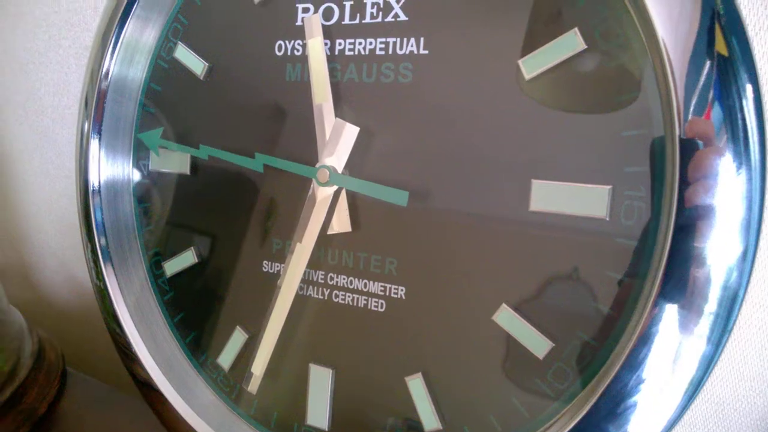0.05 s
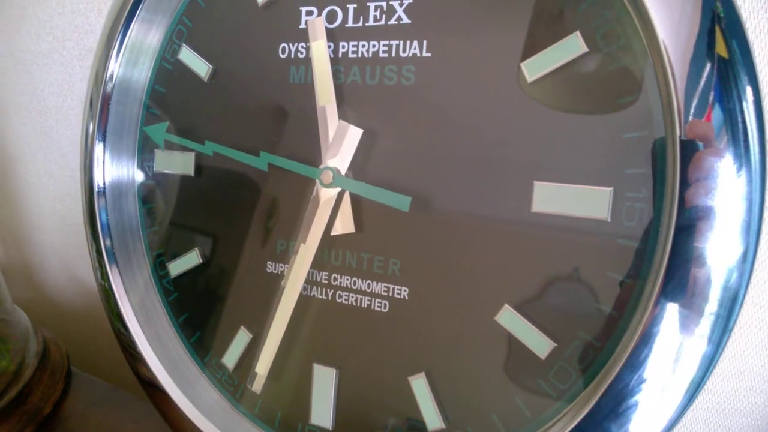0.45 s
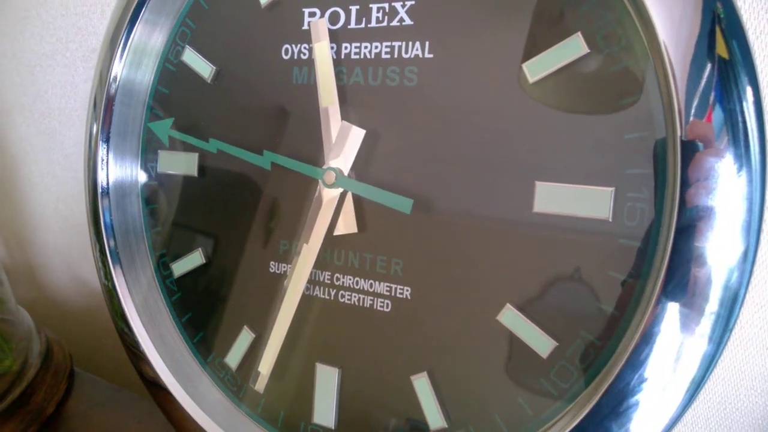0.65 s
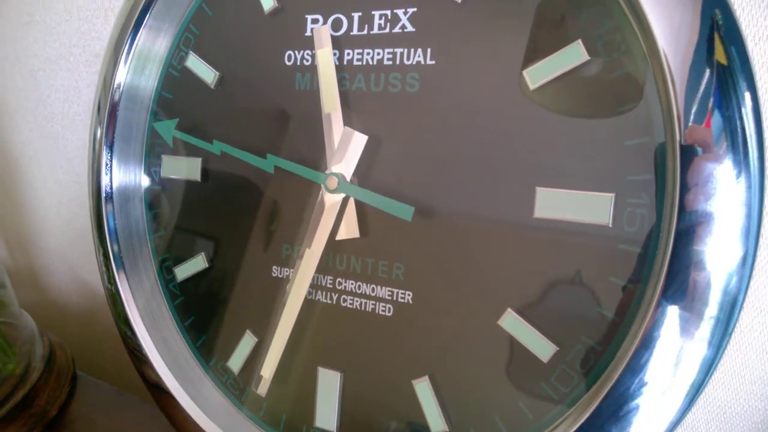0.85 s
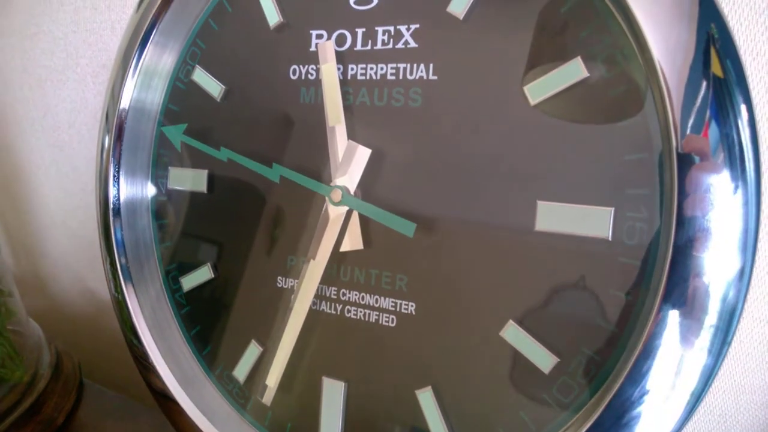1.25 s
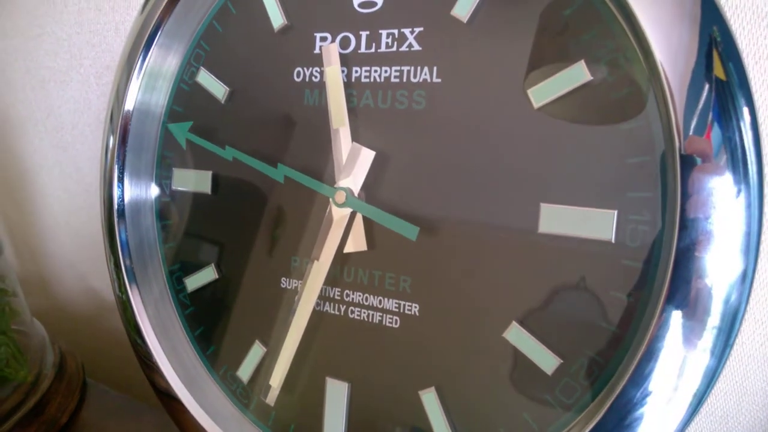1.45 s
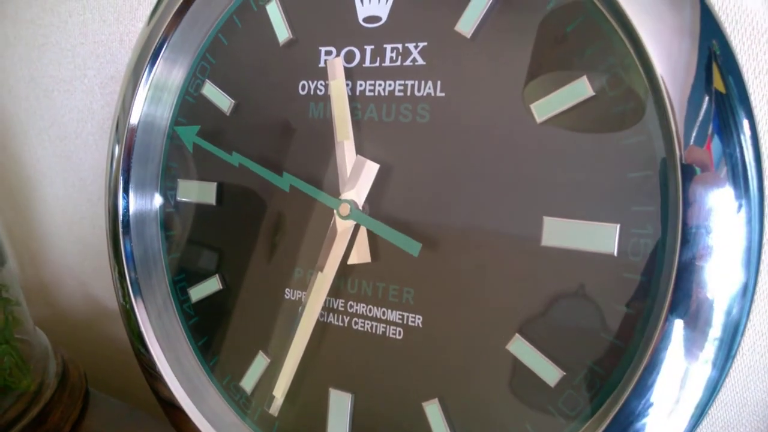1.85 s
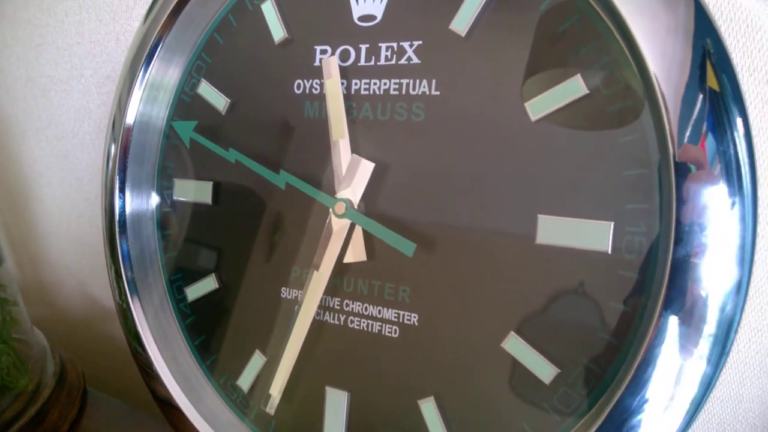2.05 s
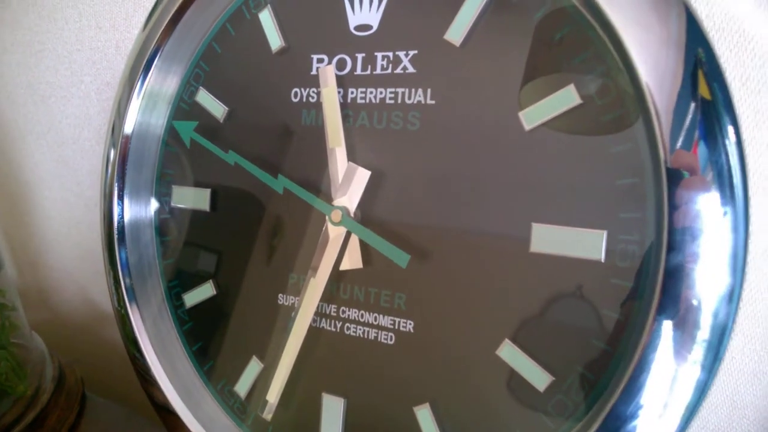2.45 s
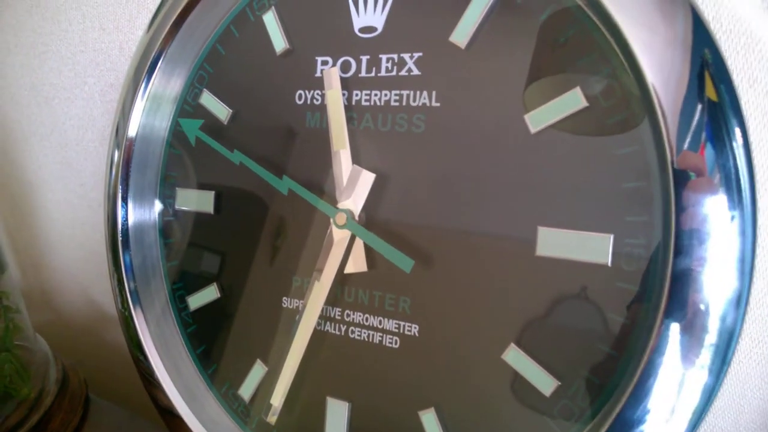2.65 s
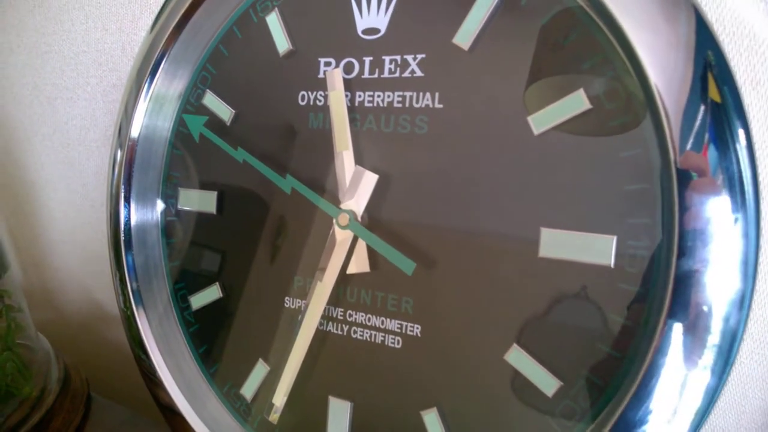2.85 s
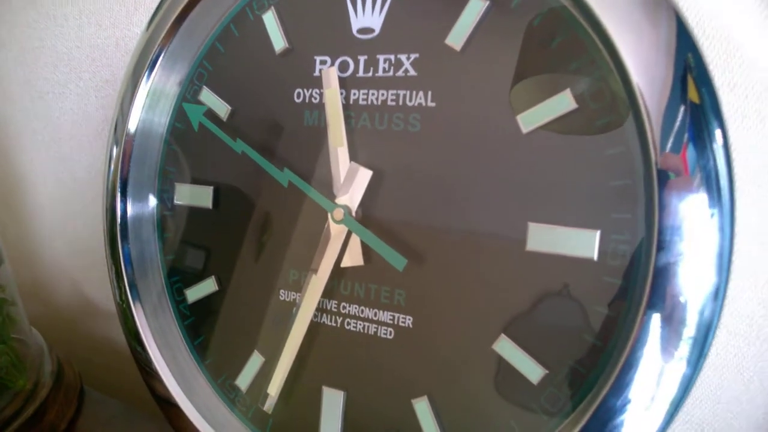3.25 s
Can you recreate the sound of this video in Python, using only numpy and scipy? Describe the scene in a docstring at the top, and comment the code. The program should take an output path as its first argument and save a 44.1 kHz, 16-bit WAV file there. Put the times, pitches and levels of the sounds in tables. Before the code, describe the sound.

Low rumble of a hand-held microphone, with one small click and two soft scuffs.

```python
"""A quiet room, heard from a hand-held camera close to a wall clock.
One small, sharp click rings briefly, and two soft, hollow scuffs sound farther off, two seconds apart.
The hand rumbles as it rocks and rubs the camera, the grip gives a few dull bumps, and fingers rustle.
Behind it all are an even hiss, a low drone and a faint hum."""
import sys
import numpy as np
from scipy import signal
from scipy.fft import rfft, irfft, next_fast_len
from scipy.io import wavfile
from scipy.ndimage import map_coordinates

SR = 44100
rng = np.random.default_rng(int(sys.argv[2]) if len(sys.argv) > 2 else 0)


def unload_audio(sound):
    """Save the sound as a 16-bit wav file, at the path given as the first command line argument."""
    columns = np.transpose(np.atleast_2d(sound))
    # keep every value between -1 and 1, then stretch to whole-number steps
    steps = np.round(np.clip(columns, -1, 1) * 32767)
    wavfile.write(sys.argv[1], SR, steps.astype(np.int16))


N = 149940
TIME = np.arange(N) / SR


def amp(db):
    """Turn decibels into a number to multiply by."""
    return 10 ** (np.asarray(db) / 20)


def wobble(rate):
    """A smooth random curve through `rate` values a second."""
    return map_coordinates(rng.standard_normal(200), [TIME * rate], mode="wrap")


def noise(gain_at):
    """Noise of average strength (rms) 1, shaped by a gain for each frequency."""
    size = next_fast_len(N + 8192)
    spectrum = rfft(rng.standard_normal(size)) * gain_at(np.fft.rfftfreq(size, 1 / SR))
    shaped = irfft(spectrum, size)[:N]
    return shaped / np.sqrt(np.mean(shaped ** 2) + 1e-30)


def coloured(points):
    """Noise whose tone colour follows (f/Hz, relative level/dB) points."""
    f, db = np.transpose(points)
    return noise(lambda hz: amp(np.interp(np.log(hz + 1), np.log(f + 1), db)))


def decay(start, fade):
    """Jump to 1 at `start`, then die away; a fade time is how long a 60 dB drop takes."""
    age = TIME - start
    return (age >= 0) * np.exp(-np.log(1000) * np.abs(age) / fade)


def swell(peak, rise, fade):
    """Grow to 1 at the time `peak`, then die away."""
    age = TIME - peak
    return np.exp(np.minimum(age / rise, -np.log(1000) * age / fade))


def ping(hz, start, fade):
    """A pure tone that starts suddenly and dies away."""
    return np.sin(2 * np.pi * hz * (TIME - start)) * decay(start, fade)


# The hits that make up the click: t/s, level/dB, fade time/s
CLICK_HITS = [(0.3966, -52, 0.0045), (0.3998, -47, 0.019), (0.4164, -48.5, 0.014)]
# Tone colour of the crack and its echo: f/Hz, relative level/dB
CRACK_COLOUR = [(600, -50), (1500, -19), (2200, -11), (3300, -1.5), (4600, -4), (6300, -5), (8500, -8.5),
                (10000, -5.5), (11500, -14), (15500, -28)]
# Tones the small part rings with: f/Hz, relative level/dB, fade time/s
CLICK_TONES = [(3104, -17, .2), (3374, -32, 0.24), (3495, -21.5, 0.2), (3536, -21, 0.17), (3840, -20, 0.13),
               (6040, -22, 0.087), (6500, -26, 0.099), (7200, -17, 0.12), (9500, -25, .1)]
def click(low_cut_hz=1710, echo_db=-11.5, echo_fade_s=0.2):
    """Three quick, hard hits blend into one click: each has a crack, a thin ring and a room echo."""
    out = np.zeros(N)
    for start, db, crack_fade in CLICK_HITS:
        crack = coloured(CRACK_COLOUR) * decay(start, crack_fade)
        ring = np.zeros(N)
        for hz, tone_db, fade in CLICK_TONES:
            strength = amp(tone_db + rng.normal(0, 1.7))
            ring += strength * ping(hz + rng.normal(0, 5.4), start, fade)
        echo = amp(echo_db) * coloured(CRACK_COLOUR) * decay(start, echo_fade_s)
        out += amp(db) * (crack + ring + echo)
    # A small part gives off very little low sound.
    return signal.sosfilt(signal.butter(2, low_cut_hz, "highpass", fs=SR, output="sos"), out)


# The scuffs: t/s, rasp level/dB, ring level/dB, ring fade time/s, ring brightness/(dB per octave)
SCUFF_STROKES = [(0.994, -64, -64.5, 0.49, 1), (2.994, -64.5, -66.5, 0.33, -2)]
# Tone colour of the rasp: f/Hz, relative level/dB
RASP_COLOUR = [(300, -68), (700, -5), (1400, -1), (1900, -6), (2500, -0.5), (3600, -5), (4600, -2.5),
               (5600, -8.5), (6300, -6), (9000, -18), (15000, -30)]
# Narrow bands where a scuff rings: f/Hz, width/Hz, relative level/dB
HOLLOW_BANDS = [(602, 18, -11.5), (686, 10.6, -0.5), (766, 53, -15), (950, 54, -14), (1340, 65, -15.5),
                (1580, 190, -19.5)]
def scuffs(ring_lag_s=0.014):
    """A soft rasp swells, and a hollow ring lingers after it."""
    def hollow(f):
        # Flipping every other band avoids deep gaps between them.
        return sum((-1) ** k * amp(db) * 1j * f * width / (hz * hz - f * f + 1j * f * width)
                   for k, (hz, width, db) in enumerate(HOLLOW_BANDS))

    out = np.zeros(N)
    for peak, rasp_db, ring_db, ring_fade, brightness in SCUFF_STROKES:
        ring = noise(lambda f: hollow(f) * amp(brightness * np.log2(f + 1)))
        out += amp(rasp_db) * coloured(RASP_COLOUR) * swell(peak, rise=0.022, fade=0.3)
        out += amp(ring_db) * ring * swell(peak + ring_lag_s, rise=0.019, fade=ring_fade)
    return out


# How strongly the hand moves, in three stretches that follow each other: t/s, level/dB
HAND_MOVES = [
    [(0.0, -52), (0.04, -52), (0.184, -54.5), (0.32, -33), (0.436, -41), (0.48, -56.5), (0.638, -33),
     (1.034, -50.5), (1.12, -63)],
    [(1.12, -67), (1.198, -48.5), (1.274, -44), (1.922, -68), (1.948, -49), (2.184, -61), (2.234, -50),
     (2.328, -43), (2.42, -82)],
    [(2.42, -81), (2.488, -41.5), (2.648, -42), (2.78, -59), (2.812, -45.5), (3.136, -47), (3.268, -67),
     (3.3, -50.5), (3.4, -54)],
]
# Tone colour of the rubbing grip: f/Hz, relative level/dB
RUB_COLOUR = [(10, -13), (25, 6), (45, -6.5), (65, -17.5), (90, -30), (150, -34.5), (300, -40.5),
              (700, -78.5), (2000, -109)]
def hand_rumble(rock_hz=26.26, wander_hz=1.274, rock_db=0.5, rub_db=-5.5):
    """The camera rocks in the hand and the grip rubs; both swell with each movement."""
    level = amp(np.interp(TIME, *np.transpose(np.vstack(HAND_MOVES))))
    pitch = rock_hz + wander_hz * wobble(9)
    rocking = np.sqrt(2) * np.sin(2 * np.pi * np.cumsum(pitch) / SR)
    return level * (amp(rock_db) * rocking + amp(rub_db) * coloured(RUB_COLOUR))


# Pushes from the grip: t/s, level before dulling/dB, contact time/s
GRIP_PUSHES = [(0.565, -56, 0.0008), (0.604, -56.5, 0.00084), (1.36, -54, 0.0018), (1.371, -49.5, 0.00096),
               (1.513, -61, .0015), (1.931, -55, 0.00029), (1.942, -51.5, 0.00049), (2.064, -49.5, 0.0012),
               (2.109, -51.5, 0.002), (2.937, -39, 0.0015), (3.052, -53.5, .0006)]
# Tones the camera body rings with: f/Hz, relative level/dB, fade time/s
BODY_TONES = [(115.4, -4.5, 0.15), (133, 0.5, 0.041), (196, -6.5, 0.04), (364, -7, .025)]
def grip_bumps():
    """Soft pushes make the camera body ring; a longer contact sounds duller."""
    out = np.zeros(N)
    for start, db, contact in GRIP_PUSHES:
        ring = sum(amp(tone_db) * ping(hz, start, fade) for hz, tone_db, fade in BODY_TONES)
        dullness = np.exp(-2 / (contact * SR))
        out -= amp(db) * signal.lfilter([1 - dullness], [1, -dullness], ring)
    return out


# Small slides of the fingers: t/s, level/dB, half length/s
FINGER_SLIDES = [(1.995, -73.5, .04), (2.245, -77.5, 0.054), (2.401, -71, 0.0056)]
# Tone colour of the rustle: f/Hz, relative level/dB
RUSTLE_COLOUR = [(150, -25), (350, -14), (900, -2), (1400, -8), (3000, -18), (12000, -22)]
def finger_rustle():
    """Fingers slide a little on the camera, each slide swelling and fading."""
    level = sum(amp(db) * np.exp(-((TIME - peak) / half) ** 2) for peak, db, half in FINGER_SLIDES)
    return level * coloured(RUSTLE_COLOUR)


# Tones of the faint hum: f/Hz, level/dB
HUM_TONES = [(226, -83), (698, -99), (7000, -96.5)]
# How loud the low drone is over time: t/s, level/dB
DRONE_SWELLS = [(0, -58), (.25, -51), (.5, -53), (.85, -53.5), (1.1, -57), (1.4, -53.5), (1.57, -63),
                (1.75, -53.5), (2.1, -58.5), (2.3, -53.5), (2.5, -56.5), (3.0, -63), (3.4, -64)]
# Tone colour of the drone: f/Hz, relative level/dB
DRONE_COLOUR = [(15, -25), (30, -6.5), (48, -6.5), (58, -1.5), (70, -8.5), (85, -26.5), (130, -33),
                (300, -98)]
# Tone colour of the hiss: f/Hz, relative level/dB
HISS_COLOUR = [(50, -21), (90, -0.5), (120, -1.5), (200, -5), (290, -10.5), (440, -12.5), (560, -14.5),
               (800, -15.5), (1300, -17.5), (2500, -18.5), (5400, -19), (8000, -21.5), (12000, -22),
               (16000, -21.5)]
def room_background(hiss_db=-66.5):
    """The air and the microphone hiss evenly, a low drone swells and ebbs, and a hum wavers slightly."""
    hum = np.zeros(N)
    for hz, db in HUM_TONES:
        hum += amp(db) * np.sqrt(2) * np.sin(2 * np.pi * hz * TIME + 0.88 * wobble(3.4))
    drone_level = amp(np.interp(TIME, *np.transpose(DRONE_SWELLS)))
    drone = drone_level * coloured(DRONE_COLOUR)
    hiss = amp(hiss_db) * coloured(HISS_COLOUR)
    return hiss + drone + hum


def scene():
    """All the sounds add up at one microphone."""
    return (room_background() + hand_rumble() + finger_rustle() + grip_bumps() + click() + scuffs())[None]


def record(dry, top_hz=15850):
    """The camera cuts off the very highest treble."""
    edge = SR // 10  # extra sound at both ends keeps the filter from clicking
    padded = np.pad(dry, ((0, 0), (edge, edge)), mode="reflect", reflect_type="odd")
    treble_cut = signal.firwin(1001, top_hz, fs=SR)
    return signal.fftconvolve(padded, treble_cut[None], mode="same", axes=1)[:, edge:edge + N]


dry = scene()
out = record(dry)
unload_audio(out)
```